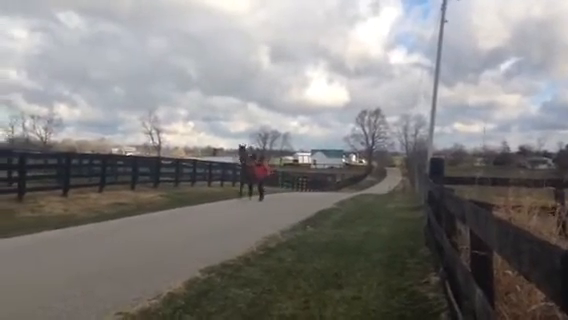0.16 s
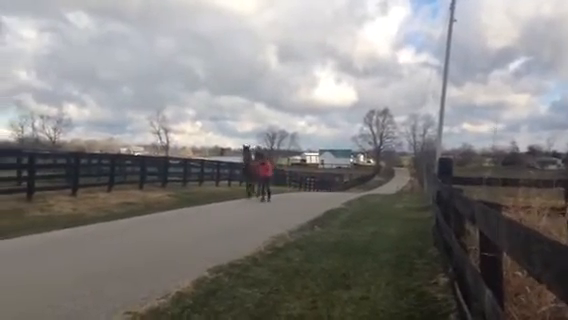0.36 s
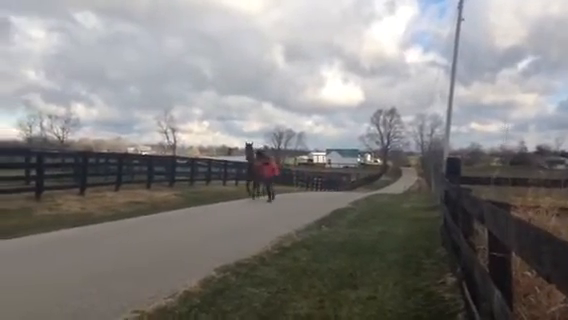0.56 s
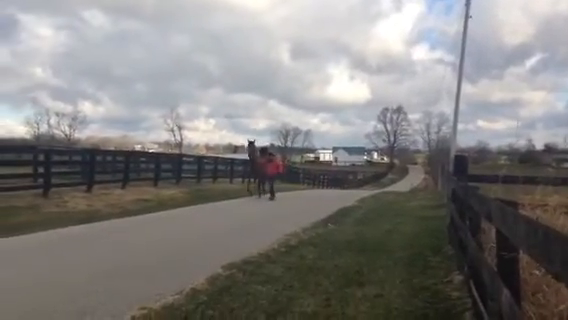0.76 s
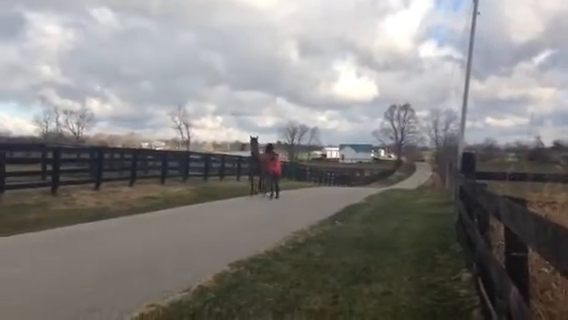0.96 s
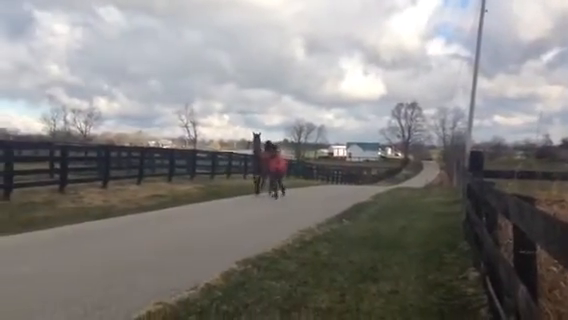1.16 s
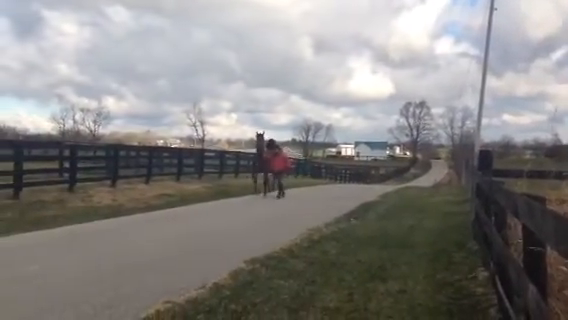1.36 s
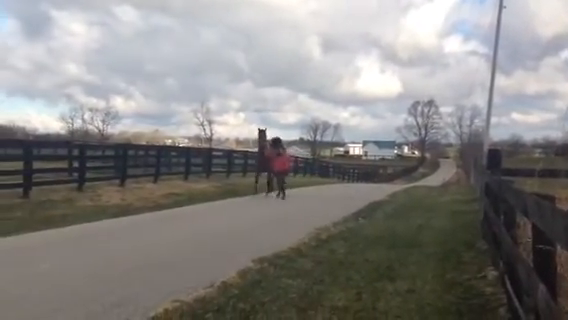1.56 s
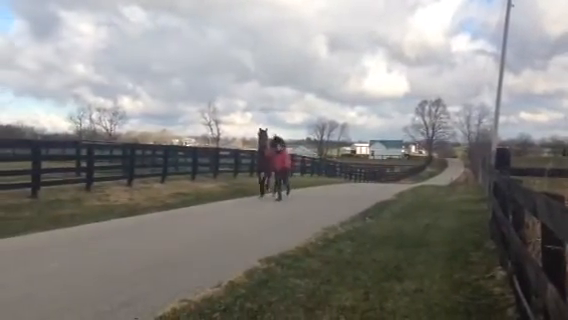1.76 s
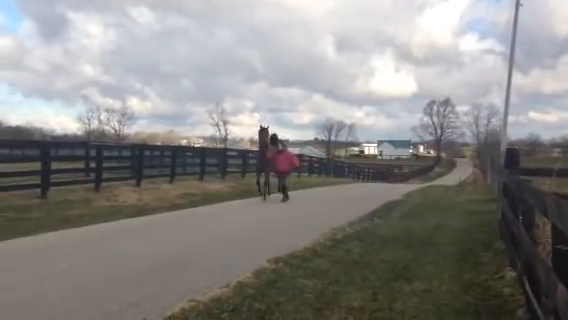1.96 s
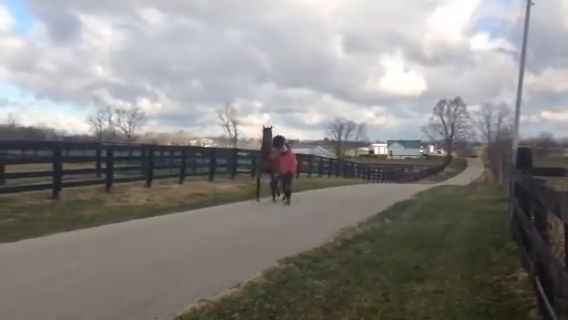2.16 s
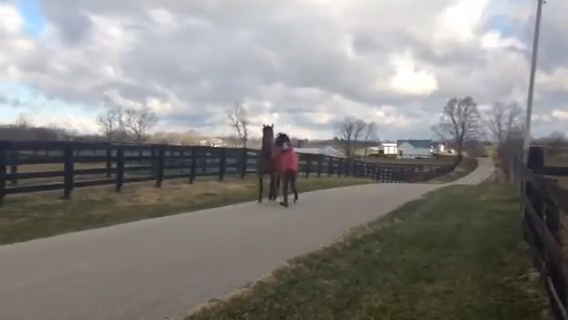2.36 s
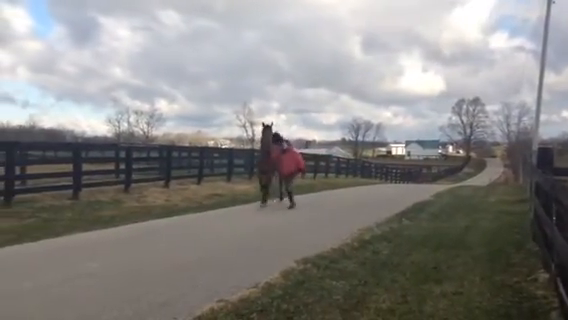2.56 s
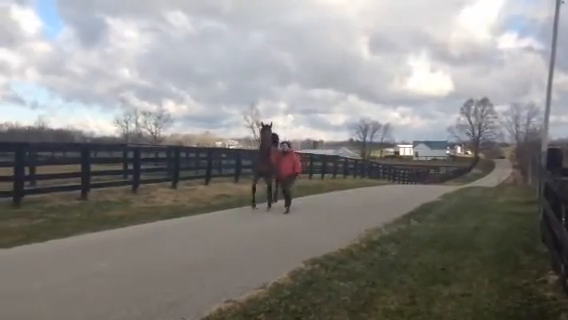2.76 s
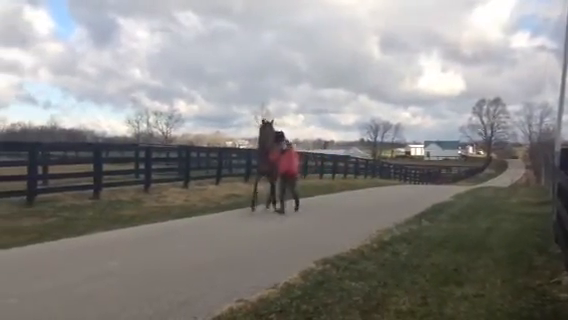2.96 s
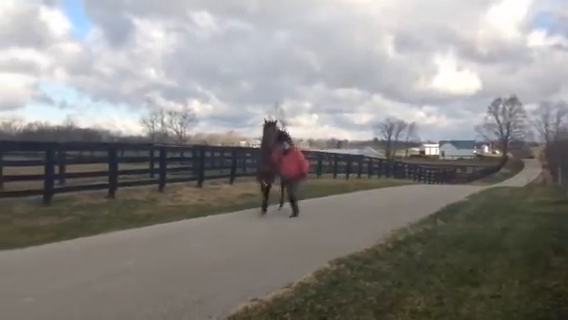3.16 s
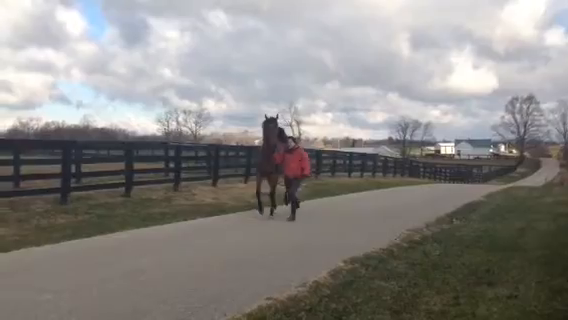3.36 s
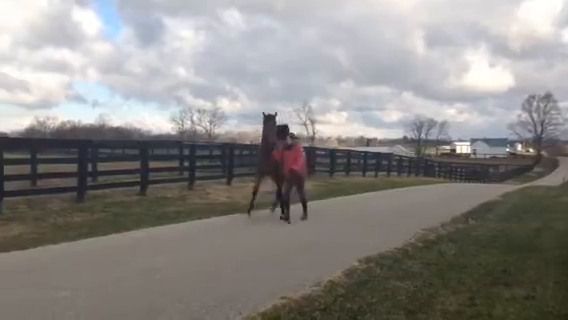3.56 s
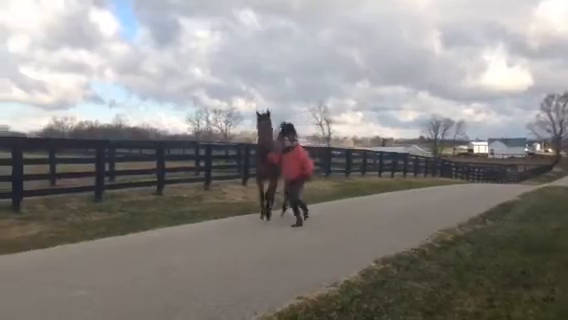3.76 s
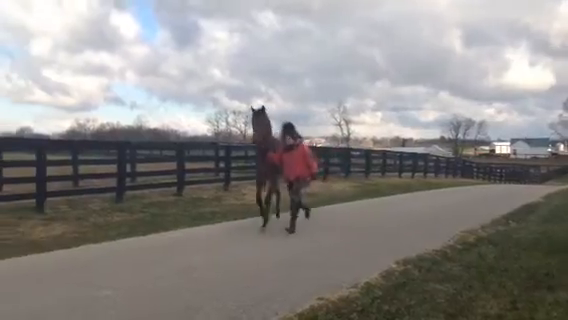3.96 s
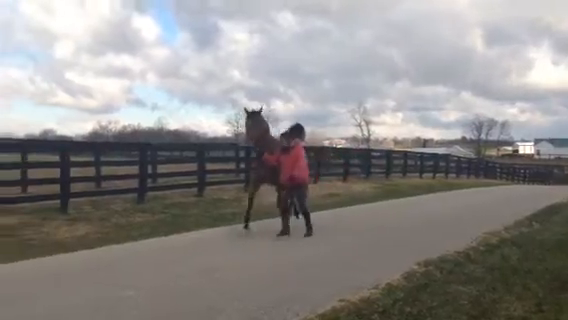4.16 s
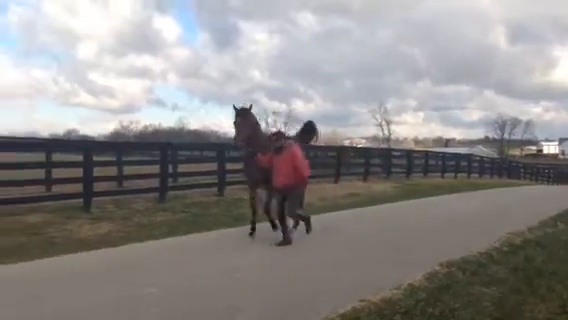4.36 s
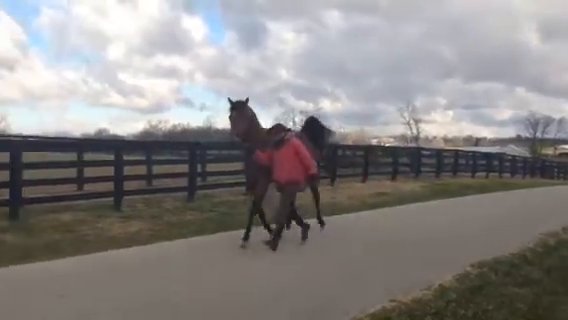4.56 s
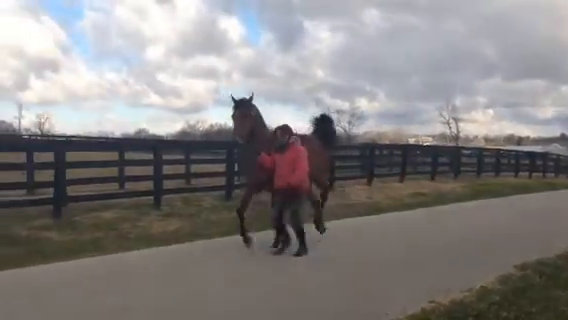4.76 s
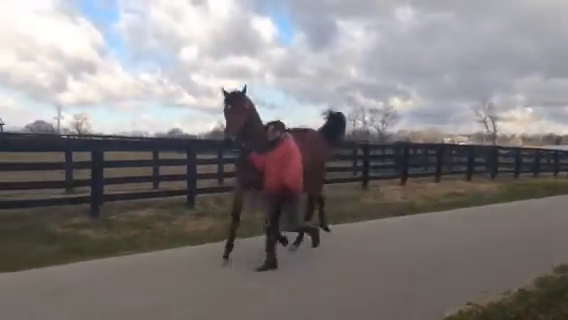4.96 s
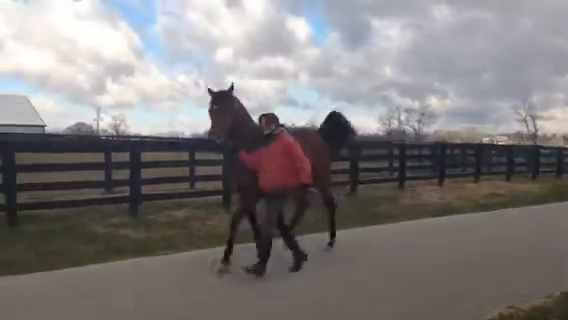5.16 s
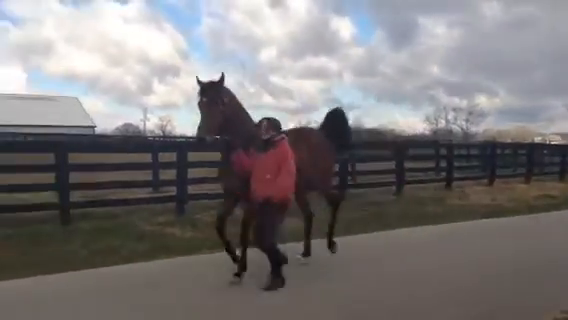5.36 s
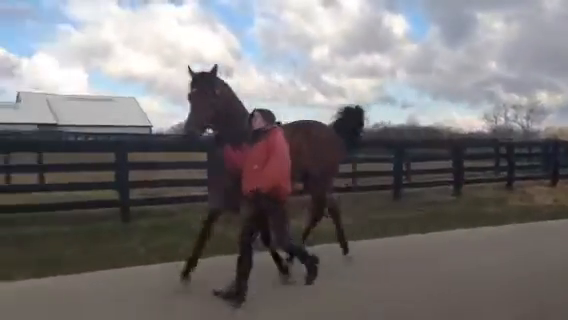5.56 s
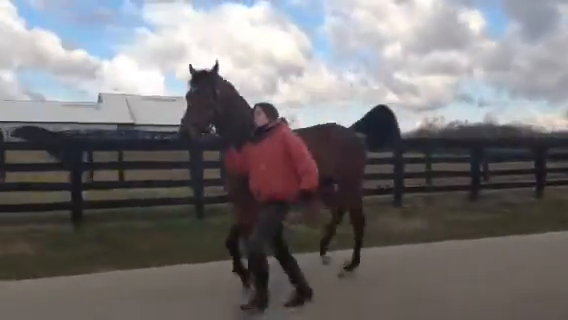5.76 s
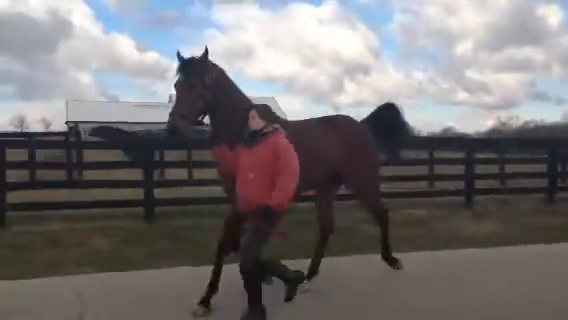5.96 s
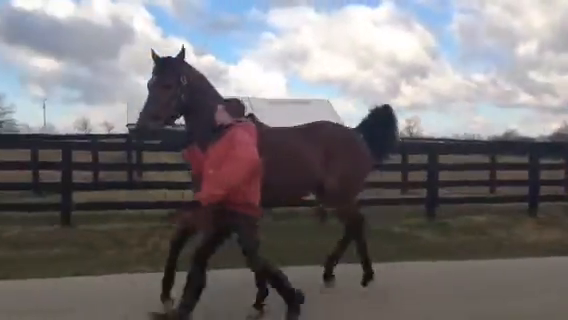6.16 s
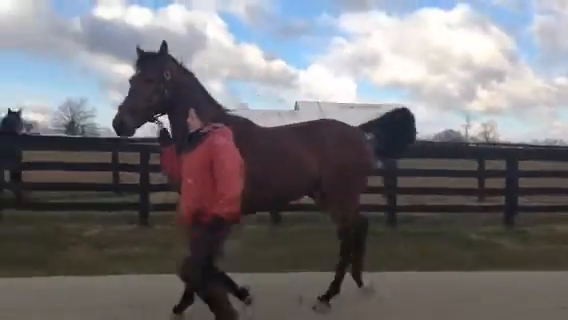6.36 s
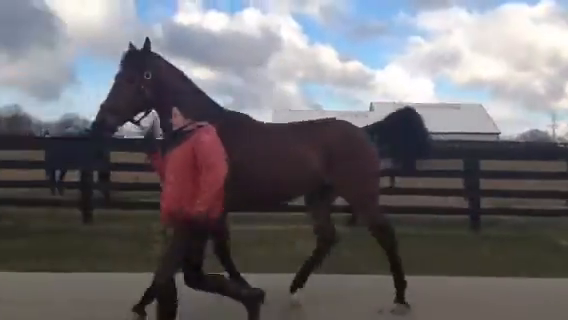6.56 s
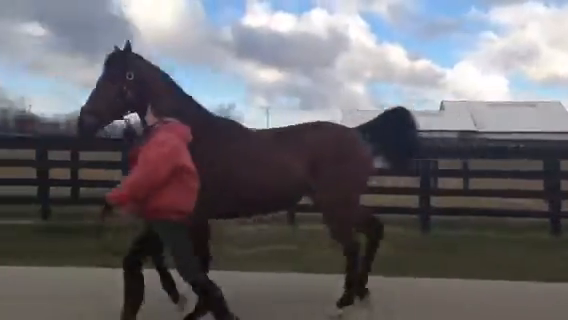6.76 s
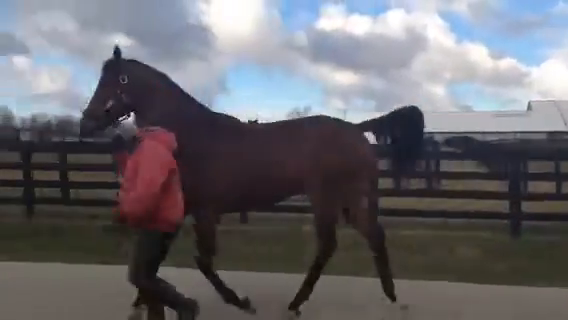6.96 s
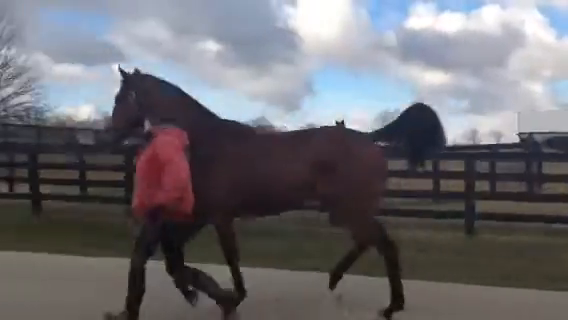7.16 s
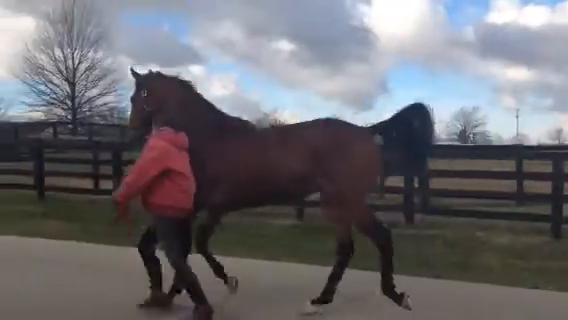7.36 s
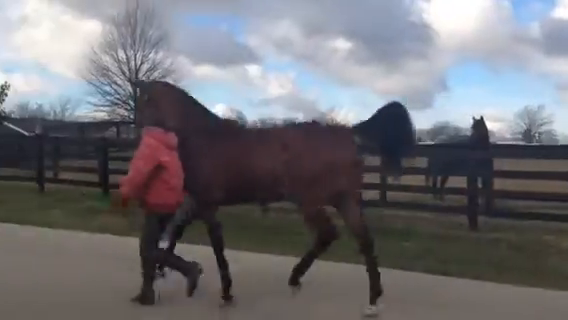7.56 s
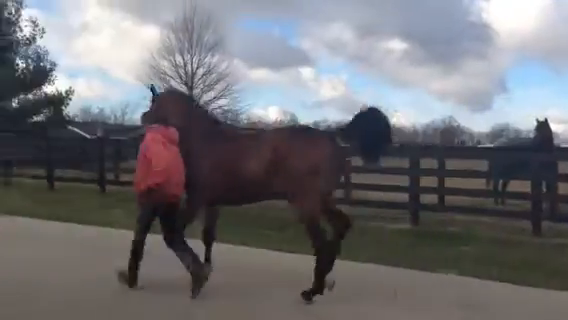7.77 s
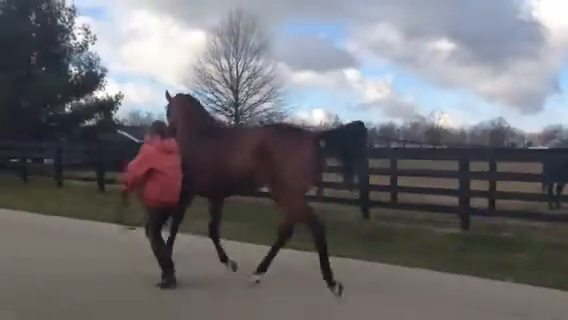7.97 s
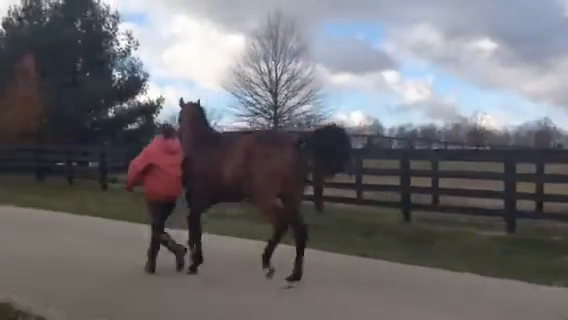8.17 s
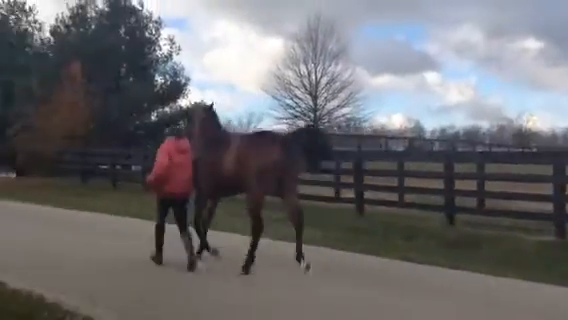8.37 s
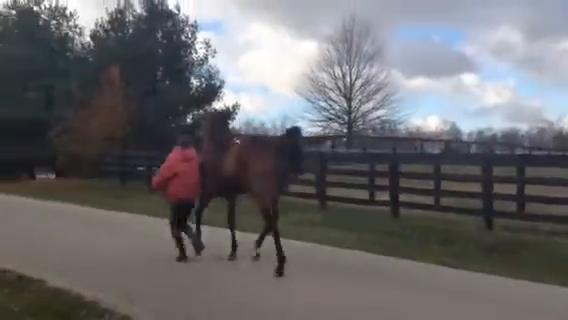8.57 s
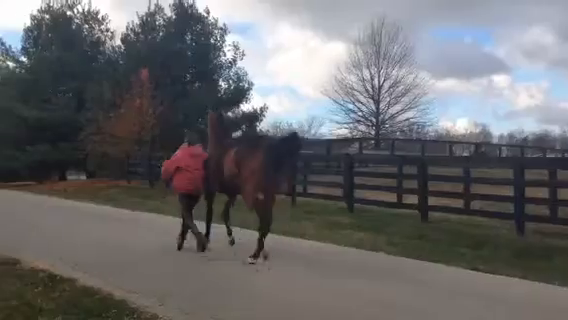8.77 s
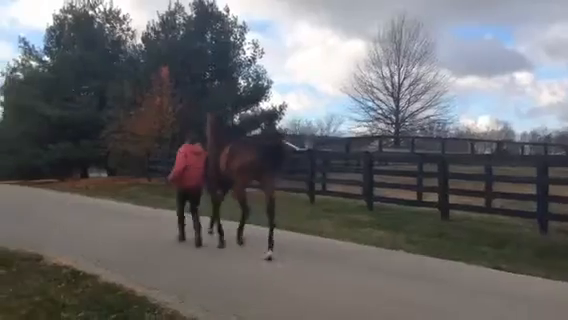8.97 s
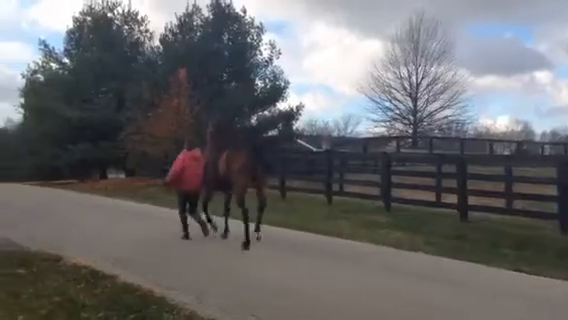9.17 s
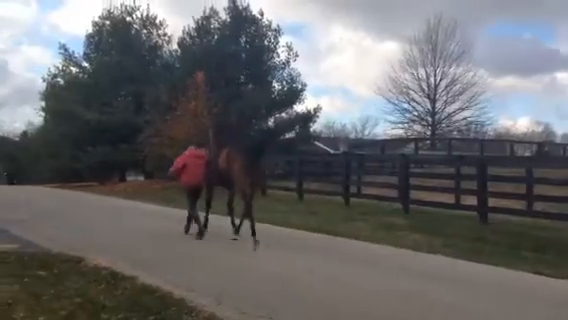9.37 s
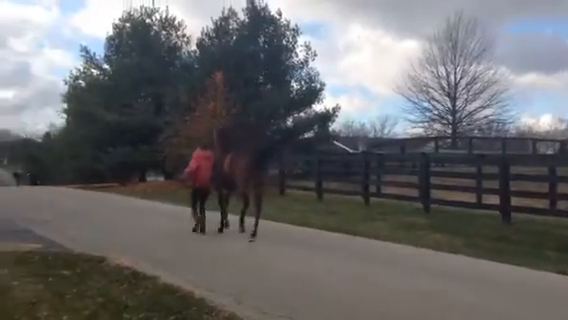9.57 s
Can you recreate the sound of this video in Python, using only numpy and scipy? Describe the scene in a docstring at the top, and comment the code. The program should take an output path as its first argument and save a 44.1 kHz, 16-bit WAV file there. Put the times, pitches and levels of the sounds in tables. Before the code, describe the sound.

Outdoors on a paved farm lane, a horse approaches at an even trot, about three clops a second. Each is a quick cluster of horn knock, hollow ring and crunching grit. Jogging boots slap and soles scuff as the pair comes close, cloth and tack rustling. They pass a microphone on the verge, then soften. Light wind bumps, faint traffic drone and short fence echoes surround them.

```python
"""Horse trotting past on a paved lane

A horse is led past at a trot, its handler jogging beside it, heard from the grass verge. Each clop is a cluster
of contacts: the horn wall knocks, the hollow under the sole rings, grit crunches and the road thuds.
Boots slap and soles scuff, fences echo, cloth and tack rustle, and a light breeze bumps the microphone."""
import sys
import numpy as np
from scipy import signal
from scipy.io import wavfile
from scipy.ndimage import uniform_filter1d

SR = 44100
rng = np.random.default_rng(int(sys.argv[2]) if len(sys.argv) > 2 else 0)


def master(y):
    """Save y as 16-bit WAV."""
    cut = np.clip(np.atleast_2d(y).T, -1, 1)
    pcm = np.round(cut * 32767)  # scale
    wavfile.write(sys.argv[1], SR, pcm.astype(np.int16))


N = 424683
GRAIN = 4096  # samples in one short sound
AGE = np.arange(GRAIN) / SR  # s since its onset
PASS_S = 7.52  # the horse is closest

# Beats of the trot, one per diagonal pair: a toe touches, the hooves roll down, a sole cups air, a heel slaps flat.
# Each row: start in seconds, toe knock in dB, roll knock in dB, cup delay in s, cup ring in dB, cup pitch in Hz,
# slap delay in s, slap knock in dB, grinding share of the slap (0-1), gritty edge in dB re knock.
BEATS = [(0.3033, -36, -44, 0.02, -43, 995, 0.052, -36, .15, -12),
         (.673, -39.5, -46, 0.045, -44.5, 986, .053, -38, 0.5, -11.5),
         (1.053, -37.5, -41, 0.012, -39.5, 990, 0.04, -33.5, 0.25, -14),
         (1.4095, -36.5, -52, .035, -41, 1065, 0.026, -33.5, 0.94, -12.5),
         (1.7646, -39.5, -48, 0.01, -36.5, 964, 0.041, -30.5, 0, -10),
         (2.1041, -36.5, -38, 0.01, -38, 1110, 0.032, -36, 0.3, -14),
         (2.4529, -33.5, -36.5, 0.0077, -38.5, 940, 0.029, -31, .3, -12),
         (2.785, -43, -42.5, .010, -37, 1100, 0.03, -34, 1, -9.5),
         (3.1097, -36.5, -39.5, 0.011, -34.5, 980, .0245, -33.5, 0.65, -7.5),
         (3.427, -39, -37.5, .019, -34.5, 995, .045, -33.5, 1, -8.5),
         (3.766, -32.5, -39.5, 0.016, -35.5, 990, .0057, -27.5, 0.6, -11),
         (4.0718, -33.5, -35, 0.01, -33, 944, 0.054, -27, 0.9, -12.5),
         (4.4234, -34, -41.5, 0.013, -31, 1070, .030, -32, 0.99, -11),
         (4.744, -35.5, -31.5, 0.037, -31, 1020, .039, -28, 0.83, -14),
         (5.0799, -32.5, -29.5, 0.017, -29, 1045, 0.04, -31, 0.13, -11),
         (5.4236, -38, -34, 0.027, -27.5, 953, 0.02, -28.5, 0.98, -9),
         (5.7668, -37, -37, 0.013, -30.5, 820, .016, -25, 0.64, -8),
         (6.0946, -29, -33.5, 0.023, -23, 990, 0.028, -25.5, 0.3, -10),
         (6.4417, -32.5, -34, .0187, -26.5, 945, .0215, -27.5, 0.1, -10.5),
         (6.767, -29, -35, 0.024, -23.5, 917, 0.033, -22, 0.12, -9.5),
         (7.1178, -36, -45, 0.01, -23, 950, 0.02, -30.5, 0.11, -6),
         (7.45, -24.5, -28, 0.044, -25, 950, .022, -30.5, .6, -10.5),
         (7.7938, -27.5, -36.5, 0.011, -22, 965, 0.034, -25.5, 0.26, -12),
         (8.1317, -26.5, -29, 0.048, -23.5, 1016, 0.05, -24.5, 0.95, -9.5),
         (8.4915, -26, -30.5, 0.023, -26.5, 1047, 0.027, -31.5, 0.5, -14),
         (8.8382, -28.5, -58, 0.0078, -28.5, 940, 0.047, -28, 0.4, -7),
         (9.1831, -26.5, -32.5, .016, -23, 1006, 0.032, -28.5, .6, -12),
         (9.558, -32, -38.5, 0.01, -32.5, 1040, 0.034, -32, .9, -12.5)]
# Resonances of rubbed cloth and soles. Each row: centre in Hz, width in Hz, gain in dB.
RUSTLE_MODES = [(533, 480, 0), (920, 360, 6), (1600, 400, 4), (2300, 226, 7), (4000, 730, -2)]


def undb(db):
    """Decibels to gain."""
    return 10 ** (np.asarray(db) / 20)


def unit(x):
    """Scale to unit energy."""
    return x / np.sqrt(np.sum(x ** 2) + 1e-18)


def blow(x, db):
    """Scale a short sound to the energy of a hundredth of a second at this level."""
    return unit(x) * undb(db) * np.sqrt(SR / 100)


def level(x, db):
    """Scale a long sound to this rms level."""
    return x * undb(db) / np.std(x)


def add(out, s, x):
    """Mix x in at time s."""
    i = max(int(s * SR), 0)
    out[i:i + len(x)] += x[:max(N - i, 0)]


def band(x, lo_hz, hi_hz, order=2):
    """Butterworth band-pass."""
    sos = signal.butter(order, [lo_hz, min(hi_hz, SR / 2 - 20)], "band", fs=SR, output="sos")
    return signal.sosfilt(sos, x)


def ring(x, modes, detune=0., scatter_db=0.):
    """Drive damped modes of alternating sign; pitch and strength can vary with the spot that is struck."""
    out = 0
    chance = rng.standard_normal((len(modes), 2))
    for k, ((hz, width_hz, db), (a, b)) in enumerate(zip(modes, chance)):
        hz = hz * np.exp(detune * a)
        gain = (-1) ** k * undb(db + scatter_db * b)
        out = out + gain * signal.lfilter(*signal.iirpeak(hz, hz / width_hz, SR), x)
    return out


def walk(rate_hz):
    """Slow random wander of unit spread: held random steps, smoothed twice."""
    k = int(SR / rate_hz)
    steps = np.repeat(rng.standard_normal(N // k + 1), k)
    return level(uniform_filter1d(uniform_filter1d(steps, k), k)[:N], 0)


def grit(envelope, spread_db):
    """Tiny stones cracking under a foot: dense clicks of very unequal size."""
    sizes = undb(spread_db * rng.exponential(size=GRAIN))
    return unit(rng.standard_normal(GRAIN) * sizes * envelope)


def contact(grinding, click_s, grind_s):
    """Force of one contact: a hard click, then grinding as the foot settles."""
    share = np.clip(grinding, 0, 1)
    click = unit(np.exp(-AGE / click_s))
    return np.sqrt(1 - share) * click + np.sqrt(share) * grit(np.exp(-AGE / grind_s), spread_db=5.5)


def remoteness(s):
    """How far off the horse is: 0 as it passes, 1 down the lane."""
    lane_s = 6.03  # from far to close
    return np.clip(abs(s - PASS_S) / lane_s, 0, 1)


def behind(s):
    """How far the horse has turned its back: 0 until it passes, 1 once it is going away."""
    turn_away_s = 0.8
    return np.clip((s - PASS_S) / turn_away_s, 0, 1) ** 2


def stride_phase():
    """Position within the gait: a whole number at each landing, held before the first and after the last."""
    landings_s = np.array(BEATS)[:, 0]
    return np.interp(np.arange(N) / SR, landings_s, np.arange(len(landings_s)))


def background():
    """Rustle of cloth and tack with small ticks of loose grit, over a far rumble, a traffic drone and a hiss."""
    # Gain of the rustle of the moving pair. Each row: time in seconds, gain in dB.
    rustle_curve = [(0, -74.5), (2.1, -67), (4.4, -65.5), (5.1, -59), (5.9, -64.5), (6.9, -61.5),
                    (9.63, -61.5)]
    # Level of the drone of distant traffic. Each row: time in seconds, level in dB.
    drone_curve = [(0, -69.5), (1.4, -73.5), (2.1, -65), (5.1, -63.5), (6.9, -66.5), (8.1, -63.5),
                   (9.63, -67)]
    # Resonances of the rumble, then of the drone. Each row: centre in Hz, width in Hz, gain in dB.
    rumble_modes = [(71, 295, 2.5), (144, 162, 4)]
    drone_modes = [(228.4, 158, 0)]
    rumble_gain_db, hiss_db = -66, -69

    t = np.arange(N) / SR
    rustle_db = np.interp(t, *np.transpose(rustle_curve))
    drone_db = np.interp(t, *np.transpose(drone_curve))
    cloth, wind, traffic, hiss = rng.standard_normal((4, N))

    ticks = (rng.random(N) < 110 / SR) * undb(14 * rng.random(N) + 4 * walk(16))  # about 110 per second
    rustle = level(band(ring(cloth, RUSTLE_MODES), 290, 4500), -0.45) * undb(2 * walk(25))
    rustle += level(band(ring(ticks, RUSTLE_MODES), 400, 3500), -4)
    # quietest in mid-stance, busiest as the legs swing forward
    swing_db = 0.65 * np.cos(2 * np.pi * (stride_phase() - .95))
    rustle = rustle * undb(rustle_db + swing_db)

    rumble = level(band(ring(wind, rumble_modes), 42, 400), 1.0) * undb(4 * walk(18))
    drone = level(ring(ring(traffic, drone_modes), drone_modes), 0) * undb(drone_db)
    hiss = level(band(hiss, 200, 14000, order=1), hiss_db)
    return rustle + rumble * undb(rumble_gain_db) + drone + hiss


def eddies(count=22):
    """Weak eddies, one near each step of an even grid: (s, dB before lift, pitch scale Hz, length s)."""
    for k, (when, hard, size) in enumerate(rng.standard_normal((count, 3))):
        s = (k + .5 + .3 * when) * N / SR / count
        yield s, -61.5 + 1.5 * hard, 132 * np.exp(0.35 * size), 0.04


def breeze():
    """Small eddies thump the microphone: decaying noise bursts in a low band."""
    # Stronger bumps. Each row: time in seconds, level in dB before lift_db, pitch scale in Hz (band 0.47-1.32
    # of it), length in s (decay constant 0.29 of it).
    bumps = [(0.048, -49, 199, 0.19), (0.115, -43.5, 153, 0.039), (0.426, -55, 118, 0.037),
             (0.718, -51, 151, 0.033), (0.847, -55.5, 164, 0.08), (2.475, -49, 74, 0.07),
             (2.543, -51.5, 138, 0.0077), (2.749, -55, 184, 0.013), (2.988, -51.5, 105, 0.025),
             (4.616, -47.5, 89.5, 0.018), (5.6, -53, 105, 0.17), (7.102, -49.5, 87, 0.033),
             (8.999, -53.5, 133, 0.0073), (9.407, -52.5, 79.6, 0.019)]
    lift_db, lead_s = 10.0, .003
    out = np.zeros(N)
    for s, db, hz, length_s in [*bumps, *eddies()]:
        eddy = rng.standard_normal(GRAIN) * np.exp(-AGE / (0.29 * length_s))
        add(out, s - lead_s, blow(band(eddy, 0.47 * hz, 1.32 * hz, order=3), db + lift_db))
    return out


def push_offs():
    """Before each landing the other pair rubs off the road and flicks some grit: (s, dB, length s, Hz)."""
    lead_s, jitter_s, length_s, rub_hz = .103, 0.0063, 0.012, 980
    near_db, far_db = -45, -13.5  # close by; change down the lane
    flick_s, flick_db, flick_hz = 0.022, -1.5, 2180  # after the push; re the push
    for beat, (early, hard) in zip(BEATS, rng.standard_normal((len(BEATS), 2))):
        s = beat[0] - lead_s + jitter_s * early
        db = near_db + far_db * remoteness(s) + hard
        yield s, db, length_s, rub_hz
        yield s + flick_s, db + flick_db, length_s, flick_hz


def scuffs():
    """Feet drag briefly over the grit: a broad scrape around one rubbing tone."""
    # Feet dragging over the grit: the handler's soles and some scuffs of hooves. Each row: start in seconds,
    # reference level in dB (scrape and rub are set # from it), length in s (envelope peaks at 0.29 of it), rub
    # in Hz.
    drags = [(.226, -53.5, 0.023, 2010), (3.35, -52.5, 0.17, 594), (3.753, -36.5, 0.023, 1070),
             (5.003, -47, 0.091, 590), (5.683, -38, 0.052, 2260), (6.014, -46.5, 0.056, 553),
             (6.354, -29, 0.026, 1200), (6.644, -47, 0.015, 590), (6.671, -48, 0.025, 624),
             (7.04, -44, 0.032, 1120), (7.305, -40, 0.023, 536), (7.328, -43, 0.039, 930),
             (7.691, -38.5, 0.021, 1010), (7.935, -42.5, 0.041, 615), (8.03, -45.5, 0.019, 880),
             (8.078, -41.5, .005, 1140), (8.729, -42.5, 0.013, 1000), (9.109, -39.5, 0.016, 2180)]
    out = np.zeros(N)
    for s, db, length_s, hz in [*drags, *push_offs()]:
        drag = grit(AGE * np.exp(-AGE / (0.29 * length_s)), spread_db=3.5)
        scrape = band(ring(drag, RUSTLE_MODES, detune=0.037), 340, 2960)
        rub = band(drag, 0.78 * hz, 1.086 * hz)
        add(out, s, blow(scrape, db - 2.5) + blow(rub, db + 0.5))
    return out


def boots():
    """A sole slaps the asphalt and grinds a little, while the heel gives one clean thud."""
    # The handler's steps. Each row: start in seconds, slap level in dB, heel thud level in dB.
    steps = [(2.571, -44, -51.5), (3.194, -44, -53.5), (3.332, -53, -60), (3.816, -40, -54),
             (4.4564, -24, -36), (4.695, -43.5, -51), (5.104, -23.5, -28.5), (5.7385, -23.5, -30),
             (6.066, -40, -47), (6.3896, -24.5, -28.5), (6.702, -40, -42.5), (7.018, -28.5, -30.5),
             (7.6692, -38.5, -38.5), (8.0095, -39, -42), (8.308, -29, -49), (8.95, -39, -49)]
    # Resonances of the sole, then of the heel. Each row: centre in Hz, width in Hz, gain in dB.
    sole_modes = [(860, 260, 2.5), (1400, 360, 5), (2274, 270, 11), (4100, 740, -5.5)]
    heel_modes = [(170, 47, 2), (526, 85, 7)]
    out = np.zeros(N)
    for s, slap_db, thud_db in steps:
        force = contact(0.57, click_s=.00005, grind_s=0.0027)
        slap = band(ring(force, sole_modes, detune=0.038, scatter_db=4.0), 180, 3550, order=3)
        thud = band(ring(np.exp(-AGE / 0.00024), heel_modes, detune=0.045), 72, 1600)
        add(out, s, blow(slap, slap_db))
        add(out, s, blow(thud, thud_db))
    return out


def skids():
    """A hoof skids on a stone: decaying grit rings a short, bright scratch."""
    # Each row: start in seconds, level in dB, decay constant in s.
    scratches = [(7.453, -45.5, 0.013)]
    # Resonances of the scratch. Each row: centre in Hz, width in Hz, gain in dB.
    scratch_modes = [(7850, 2200, 3), (9400, 1900, -2)]
    out = np.zeros(N)
    for s, db, decay_s in scratches:
        scratch = ring(grit(np.exp(-AGE / decay_s), spread_db=6.5), scratch_modes)
        add(out, s, blow(band(scratch, 5500, 12000), db))
    return out


def weight():
    """The ground gives a soft low thump as each diagonal pair takes the horse's weight."""
    # Resonance of the ground. Each row: centre in Hz, width in Hz, gain in dB.
    ground_modes = [(167, 96, 0)]
    push_decay_s, thump_db = 0.023, -20.5  # thump re the slap
    out = np.zeros(N)
    for s, _, _, _, _, _, slap_s, slap_db, _, _ in BEATS:
        push = grit(np.exp(-AGE / push_decay_s), spread_db=3.0)
        thump = ring(ring(push, ground_modes), ground_modes)
        add(out, s + 0.586 * slap_s, blow(thump, slap_db + thump_db))
    return out


def landed(modes):
    """The modes as one landing loads them: every clop has its own colour."""
    detune, scatter_db = 0.03, 1.38
    chance = rng.standard_normal((len(modes), 2))
    return [(hz * np.exp(detune * a), width_hz, db + scatter_db * b)
            for (hz, width_hz, db), (a, b) in zip(modes, chance)]


def contacts(beat, count=3):
    """Unfold a beat into its contacts: (s, knock dB, hollow ring dB, ring Hz, edge dB re knock, grinding)."""
    # the hollow under the sole drops in pitch as the hoof closes on the road (ratios to the cup's pitch)
    toe_pitch, slap_pitch = 1.11, .96
    toe_hollow_db, cup_knock_db = -2.5, -5  # ring re knock; knock re ring
    roll_hollow_db, slap_hollow_db = -7, -4.5  # ring re the cup's
    toe_grinding, roll_grinding, cup_grinding = 0.95, 0.94, 0.98  # shares 0-1
    roll_scatter_db, roll_jitter = 1.3, .2  # jitter in gaps between contacts
    slap_edge_db = -6  # a flat landing spares the rim
    settle_s, settle_db = 0.01, -9.5  # a last crunch as the weight comes on; re the roll

    s, toe_db, roll_db, cup_s, cup_db, hz, slap_s, slap_db, grinding, edge_db = beat
    span_s = max(cup_s, slap_s)
    yield s, toe_db, toe_db + toe_hollow_db, hz * toe_pitch, edge_db, toe_grinding
    for k, (early, hard) in enumerate(rng.standard_normal((count, 2))):
        down = (k + 1 + roll_jitter * early) / (count + 1)
        pitch = np.interp(down, [0, 1], [toe_pitch, slap_pitch])
        knock_db = roll_db + roll_scatter_db * hard
        yield s + down * span_s, knock_db, cup_db + roll_hollow_db, hz * pitch, edge_db, roll_grinding
    yield s + cup_s, cup_db + cup_knock_db, cup_db, hz, edge_db, cup_grinding
    yield s + slap_s, slap_db, cup_db + slap_hollow_db, hz * slap_pitch, edge_db + slap_edge_db, grinding
    crunch_db = roll_db + settle_db
    yield s + span_s + settle_s, crunch_db, crunch_db, hz * slap_pitch, edge_db, roll_grinding


def hooves():
    """Every contact rings the hoof wall, the air cupped under the sole and the gritty rim, and thuds into the road."""
    # Resonances of the horn wall, then of the gritty rim. Each row: centre in Hz, width in Hz, gain in dB.
    wall_modes = [(604, 590, -12.5), (1373, 650, 2.5), (1451, 510, 2.5), (1872, 122, -3.5),
                  (2220, 188, 0.5)]
    rim_modes = [(3850, 363, 15), (4910, 980, -2.5), (7760, 280, -27)]
    # thud re knock: mostly from close by and in front of the horse
    near_db, far_db, behind_db = -12.5, -7.5, -4.5
    out = np.zeros(N)
    for beat in BEATS:
        wall, rim = landed(wall_modes), landed(rim_modes)
        for s, db, hollow_db, hollow_hz, edge_db, grinding in contacts(beat):
            force = contact(grinding, click_s=.00005, grind_s=.006)
            knock = band(ring(force, wall, detune=.04, scatter_db=2.2), 500, 2900, order=3)
            edge = band(ring(force, rim, detune=.05, scatter_db=2.2), 2900, 10500)
            # two resonators in a row: the hollow swells for a cycle or two as the sole closes on the road
            cavity = [(hollow_hz, 350, 0)]
            puff = contact(.85 * grinding, click_s=.0001, grind_s=.005)
            hollow = ring(ring(puff, cavity), cavity)
            thud = band(ring(force, [(525, 124, 0)]), 65, 660)
            thud_db = near_db + far_db * remoteness(s) + behind_db * behind(s)
            clop = blow(knock, db) + blow(hollow, hollow_db)
            clop = clop + blow(edge, db + edge_db) + blow(thud, db + thud_db)
            add(out, s, clop)
    return out


def lane(x, tail_db, t60_s):
    """Fence boards return a soft, smeared slap; posts and rails scatter a thin, uneven tail, strongest mid-range."""
    # Echoes of the boards. Each row: delay in seconds, level in dB before the band shaping.
    boards = [(.039, -20.5)]
    smear_s = 0.0021
    t = np.arange(SR // 2) / SR
    posts = rng.standard_normal(len(t)) * (rng.random(len(t)) < 600 / SR)
    echo = undb(tail_db) * unit(posts * (1 - np.exp(-t / 0.0067)) * undb(-60 * t / t60_s))
    for delay_s, db in boards:
        i = int(delay_s * SR)
        echo[i:i + GRAIN] += undb(db) * grit(np.exp(-AGE / smear_s), spread_db=5.5)
    shaped = band(echo, 300, 6800, order=1) + ring(echo, [(953, 144, -1)])
    return signal.fftconvolve(x, shaped)[:N]


def scene():
    """The steps and their echoes, which stand out more while the horse is far off, over breeze and background."""
    steps = hooves() + weight() + skids() + boots() + scuffs()
    send_db = 4.7 * remoteness(np.arange(N) / SR)
    echoes = lane(steps * undb(send_db), tail_db=-17, t60_s=0.19)
    return (steps + echoes + breeze() + background())[None]


def record(dry):
    """The microphone drops the deepest bass, its housing hollows out narrow bands; the recorder cuts the top."""
    # Dips of the housing. Each row: centre in Hz, width in Hz, depth (0-1).
    dips = [(343, 83, 0.39), (2924, 128, 1), (5940, 730, 0.05)]
    low_hz, top_hz = 39.7, 15450
    dry = signal.sosfilt(signal.butter(2, low_hz, "high", fs=SR, output="sos"), dry)
    for hz, width_hz, depth in dips:
        dry = dry - np.clip(depth, 0, 1) * signal.lfilter(*signal.iirpeak(hz, hz / width_hz, SR), dry)
    return signal.sosfilt(signal.ellip(10, .2, 70, top_hz, fs=SR, output="sos"), dry)


dry = scene()
out = record(dry)
master(out)
```